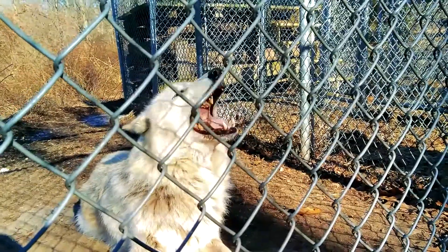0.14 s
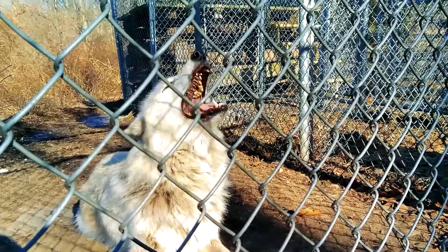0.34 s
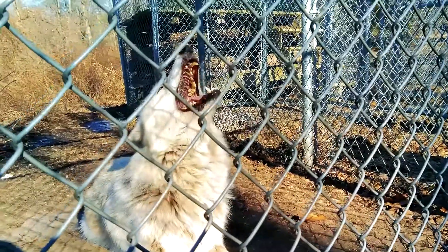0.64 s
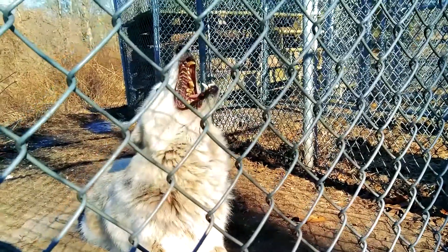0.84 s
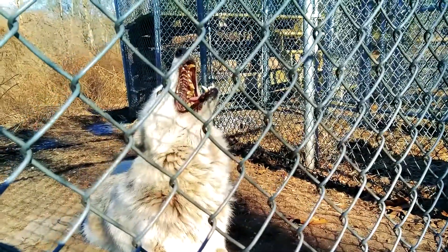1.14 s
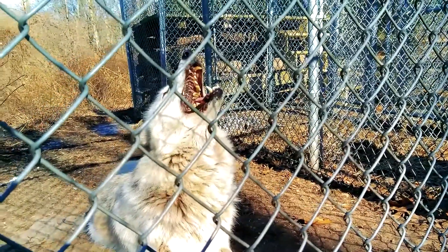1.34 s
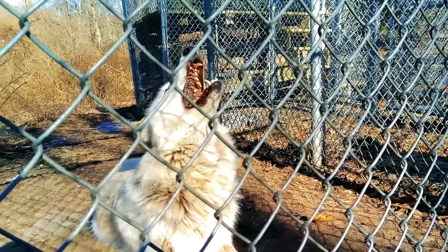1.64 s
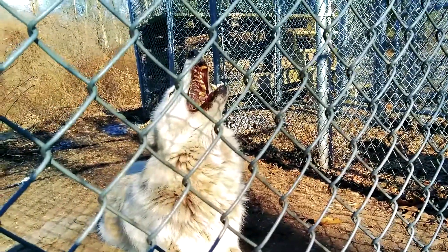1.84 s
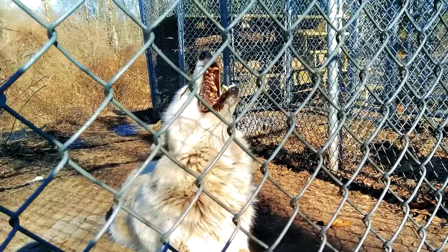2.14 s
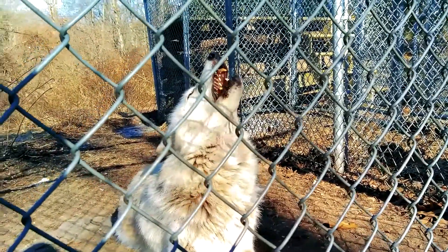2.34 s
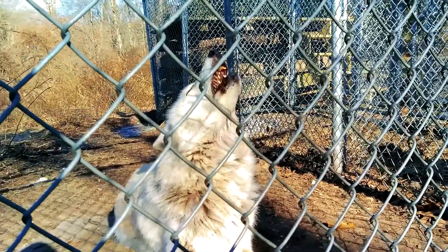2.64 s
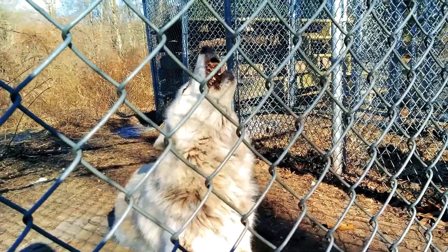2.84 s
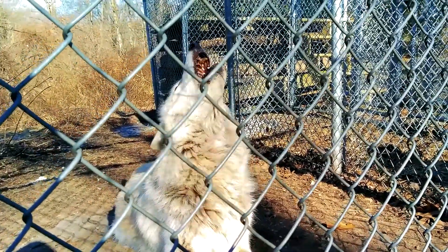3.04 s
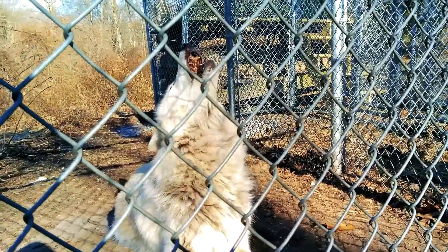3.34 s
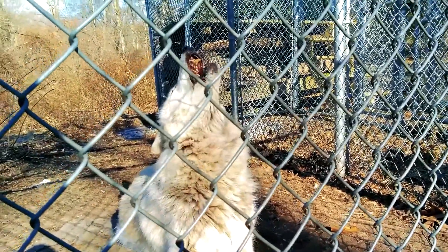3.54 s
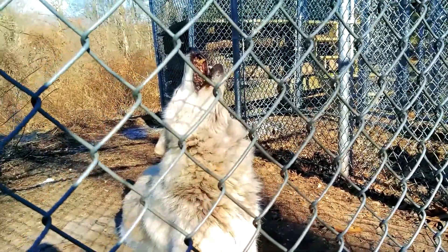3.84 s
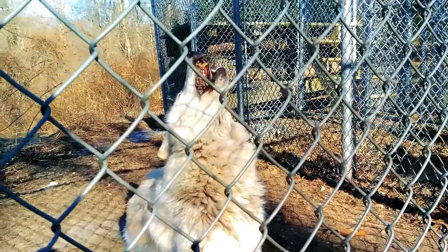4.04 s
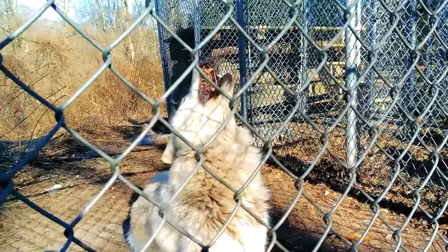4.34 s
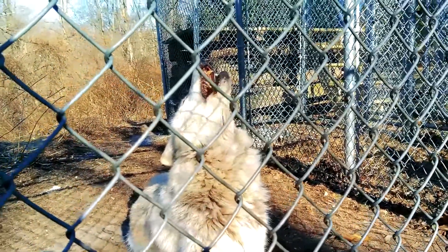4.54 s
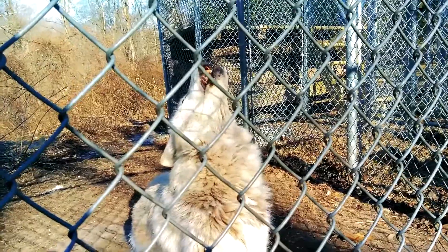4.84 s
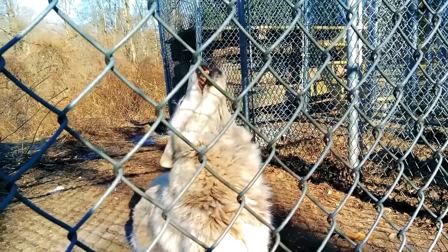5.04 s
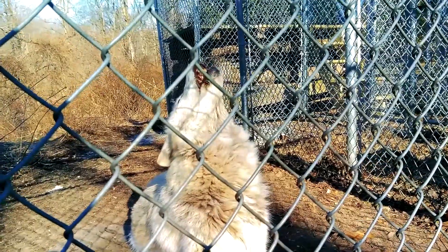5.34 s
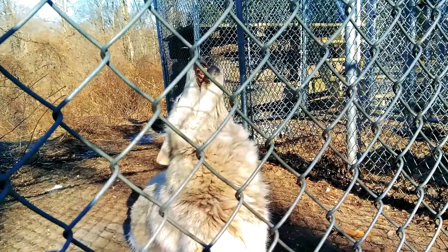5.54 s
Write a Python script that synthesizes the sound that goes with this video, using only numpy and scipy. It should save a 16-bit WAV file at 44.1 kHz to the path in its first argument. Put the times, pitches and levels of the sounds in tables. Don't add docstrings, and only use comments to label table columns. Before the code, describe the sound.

A wolf howls close to the microphone outdoors, its level held loud and flat. From 0 s a long, nearly pure, hollow note is already sounding around 900 Hz, slightly breathy and rough at first, lifting a little, then sagging to about 780 Hz by 2.4 s. A thin whistle between 5 and 6 kHz rides above it, sliding down too. From 2.4 to 2.8 s the howl stops: ragged gasping puffs of breath, a distant howl, a small far yelp and low wind thumps. At 2.8 s the wolf scoops into a second note, dips, then climbs from 3.6 s to about 1 kHz, the whistle returning strongly. Around 4.6 s, after a tiny crackle, the pitch breaks down, settling near 730 Hz; from 5 s a low second tone makes it rough and chordal until the cut at about 5.7 s. Distant pack howls waver faintly throughout; wind bumps strike near 4.5 to 5.1 s.

```python
import sys
import numpy as np
from scipy import signal
from scipy.fft import rfft, irfft, next_fast_len
from scipy.io import wavfile
from scipy.ndimage import uniform_filter1d, map_coordinates

SR = 44100
rng = np.random.default_rng(int(sys.argv[2]) if len(sys.argv) > 2 else 0)


def how_loud(loudness_db):
    steps = np.asarray(loudness_db, float) / 20
    return 10 ** steps


def put_to_file(sound):
    columns = np.atleast_2d(sound).T
    safe = np.clip(columns, -1, 1)
    whole_steps = np.round(safe * 32767)
    wavfile.write(sys.argv[1], SR, whole_steps.astype(np.int16))


N = 250488

# time_s, pitch_hz
HELD_PITCH = [
    [(0, 868), (.119, 924), (.283, 909), (.4, 953), (.66, 894), (1.2, 895), (1.38, 852), (1.57, 770),
     (2.394, 781)],
    [(2.81, 790), (3.044, 728), (3.473, 754), (3.645, 795), (3.813, 965), (4, 930), (4.232, 1012),
     (4.29, 978), (4.626, 1015)],
    [(4.627, 890), (4.726, 843), (4.771, 810), (4.865, 774), (5.15, 743), (5.404, 751), (5.45, 734),
     (5.634, 733), (5.68, 712)],
]
SUNG_SPANS = [
    [(-.1,), (2.385,)],
    [(2.815,), (5.8,)],
]
# note_end_s, next_scoop_start_s
NOTE_JOINS = [
    (2.39, 2.815),
    (4.626, 4.615),
]
# time_s, second_partial_db
FOLD_CLOSURE = [
    [(0, -26), (.2, -34.5), (.35, -27.5), (.7, -47), (1.15, -41), (1.37, -50), (1.6, -32), (2.2, -29.5),
     (2.35, -26.5)],
    [(2.81, -43), (2.9, -40), (3.2, -47), (3.9, -48.5), (4.16, -50.5), (4.3, -44.5), (4.52, -39.5),
     (4.64, -51)],
    [(4.7, -45), (4.8, -41.5), (4.9, -52), (5.28, -60.5), (5.67, -53.5)],
]
# frequency_hz, level_db
MOUTH_RESONANCE = [(3000, -17), (3700, -8.5), (4480, 3.5), (5200, -24), (5500, -1.5), (6600, -15.5),
                   (16000, -32)]
# time_s, pitch_hz
WHISTLE_PITCH = [
    [(0, 6150), (.14, 6490), (.45, 6220), (.68, 5760), (.907, 5544), (1.116, 5523), (1.376, 5394)],
    [(1.396, 5315), (1.585, 5143), (1.81, 5113), (1.93, 5160), (2.16, 5105), (2.235, 4950), (2.335, 4030)],
    [(2.815, 4280), (2.915, 4250), (2.965, 4030), (3.404, 3998), (3.678, 4190)],
    [(3.713, 4138), (3.833, 4299), (3.92, 4232), (4.107, 4292), (4.232, 4510), (4.312, 4437), (4.386, 4588),
     (4.53, 4594), (4.6, 4330)],
    [(4.87, 4040), (5.67, 4080)],
]
# time_s, whistle_db, fold_chopping_db
AIR_JET = [
    [(0, -54, -65), (.2, -42.5, -41.5), (.33, -36, -39), (.5, -24, -40), (.65, -28.5, -44), (1.2, -24, -39),
     (1.55, -29, -58.5), (2.27, -41, -66.5), (2.35, -67, -80.5)],
    [(2.82, -49, -53), (2.925, -39, -55), (2.97, -58, -65.5), (3.65, -59.5, -75.5), (3.73, -37.5, -65),
     (3.89, -45.5, -69), (4.16, -38, -67), (4.3, -28.5, -60), (4.62, -28, -53)],
    [(4.69, -58.5, -74), (4.8, -58, -82), (4.88, -71, -80), (5.1, -65, -78.5), (5.67, -64.5, -80)],
]
# frequency_hz, level_db (re whistle)
WHISTLE_OCTAVE = [(7900, -17), (8500, 4.5), (9150, -11), (10250, -37), (11000, -20), (11700, -30),
                  (12900, -27)]
# frequency_hz, level_db (re air flow)
UPPER_SIDEBAND = [(4800, -9), (5300, -19), (5900, 4.5), (6500, -16), (7300, 0.5)]
# pitch_hz, level_db (re air flow)
OUTER_SIDEBANDS = [(740, -6.5), (790, -9), (900, -18.5)]
# time_s, pitch_hz, level_db
LOW_OSCILLATOR = [
    [(3.55, 630, -53), (3.69, 472, -49), (3.85, 375, -50), (4.06, 325, -55), (4.22, 348, -55),
     (4.36, 347, -54)],
    [(4.38, 395, -55), (4.42, 390, -43), (4.52, 290, -45)],
    [(4.67, 633, -46), (4.77, 555, -39), (4.93, 506, -46), (4.99, 513, -26), (5.1, 520, -25),
     (5.2, 515, -25), (5.35, 518, -25), (5.55, 513, -25), (5.68, 511, -23)],
]
# multiple_of_tone, multiple_of_low, level_db (re low)
MIXING_PRODUCTS = [(1, 1, -12.5), (0, 2, -27), (-1, 2, -29.5), (2, -2, -31), (-2, 4, -19), (3, -3, -19),
                   (-1, 3, -53), (2, -1, -35), (3, -2, -27.5), (-1, 4, -34), (2, 1, -34.5), (1, 2, -34.5),
                   (4, -2, -47.5), (0, 3, -53)]
# time_s, air_flow_db, throat_strain_db
BREATH_FLOW = [
    [(0, -43.5, -55.5), (.28, -43, -52), (.34, -49, -52.5), (.55, -52, -53), (.65, -49, -52.5),
     (1, -49, -52.5), (1.5, -52, -55), (2.17, -64.5, -64.5), (2.37, -68, -55.5)],
    [(2.4, -69.5, -46), (2.46, -60.5, -48.5), (2.6, -64.5, -51), (2.72, -57, -47.5), (2.8, -65.5, -57.5)],
    [(2.83, -59.5, -69.5), (3.61, -57, -62), (3.75, -51, -54.5), (4.1, -52.5, -59.5), (4.4, -50, -50),
     (4.485, -44.5, -40.5), (4.55, -53, -48), (4.64, -60.5, -39)],
    [(4.68, -55, -63), (4.94, -62, -57.5), (5, -69.5, -49.5), (5.68, -70, -51)],
]
# frequency_hz, density_db (per Hz)
AIR_SPECTRUM = [(1290, -32), (2200, -3.5), (3900, -9), (4430, -2), (5350, -2.5), (6730, -12.5),
                (9300, -0.5), (15700, -16)]
# frequency_hz, density_db (per Hz)
THROAT_SPECTRUM = [(200, -39.5), (540, -19), (760, -2), (1050, -9.5), (1350, -3.5), (2100, -13.5),
                   (2700, -24.5), (6000, -50.5)]
# start_s, peak_db, length_s
INTAKE_GASPS = [
    (2.399, -39, 0.028),
    (2.436, -43.5, 0.0097),
    (2.484, -49.5, 0.057),
    (2.676, -46, .008),
    (2.706, -39, .014),
    (2.764, -44.5, 0.014),
    (2.777, -47.5, 0.015),
]
# frequency_hz, density_db (per Hz)
GASP_SPECTRUM = [(1000, -43), (2000, -6.5), (4300, -5.5), (6000, -4), (10000, -3.5), (15700, -7.5)]
# middle_s, level_db, half_length_s
CRACKLE_RUNS = [
    (0.341, -44, .05),
    (.51, -47, .04),
    (0.732, -67, 0.036),
    (4.485, -43.5, 0.019),
]
# frequency_hz, density_db (per Hz)
SLAP_SPECTRUM = [(850, -83), (1050, -3), (1400, -8.5), (1750, -14), (2600, -63.5)]
# time_s, pitch_hz, tone_db
PACK_ANSWERS = [
    [(0.0, 465, -45.5), (.1, 385, -42), (0.672, 338, -49), (0.95, 242, -76)],
    [(1.22, 270, -84), (1.27, 327, -59), (1.52, 305, -60)],
    [(1.54, 568, -51), (1.79, 520, -54.5), (1.95, 476, -69.5)],
    [(2.4, 655.6, -33.5), (2.478, 700.4, -43.5), (2.8, 665, -42.5)],
    [(2.86, 585, -60), (3.314, 424, -49.5), (4.2, 480, -50.5)],
    [(4.24, 830, -59), (4.34, 760.6, -40.5), (4.62, 747, -33.5)],
    [(4.72, 357.8, -56), (4.798, 414, -55), (4.86, 413, -51)],
    [(5.4, 470, -66), (5.558, 423.7, -43), (5.68, 424.3, -42.5)],
    [(1.5, 321, -60), (1.62, 224, -55), (1.92, 188, -72.5)],
]
PACK_SECOND_PARTIAL = [-35, -8.5, -26, -2, -38.5, -38, -19, -40, -13]
# time_s, pitch_hz, level_db
FAR_YELP = [
    (2.41, 1480, -48),
    (2.506, 1540, -42.5),
    (2.56, 1410, -108),
]
# time_s, gust_db, eddy_size_db (thump over flutter)
WIND_GUSTS = [(0.0, -52, -0.5), (0.14, -70.5, 2), (2.28, -60.5, 11.5), (2.45, -45, 19), (2.56, -52.5, 17),
              (2.78, -35.5, 19), (2.86, -52.5, 12), (4.06, -51, 7), (4.6, -30, 2.5), (4.76, -54.5, 7.5),
              (4.84, -36, 3.5), (5.68, -62, -2.5)]
# frequency_hz, density_db (per Hz)
THUMP_SPECTRUM = [(12, -19.5), (22, 13.5), (50, 5), (80, 0.5), (130, -45.5), (400, -110)]
# frequency_hz, density_db (per Hz)
FLUTTER_SPECTRUM = [(50, -33.5), (80, 0), (150, -7), (260, -15), (450, -25), (800, -52.5), (1600, -100)]
# middle_s, level_db
GUST_FRONTS = [(1.549, -45), (2.79, -56), (3.02, -49.5), (3.552, -37), (4.132, -48.5), (4.529, -26.5),
               (4.9, -30.5), (5, -35), (5.109, -42)]
# frequency_hz, level_db
FRONT_SPECTRUM = [(60, -31), (150, 8), (400, -1.5), (620, -47), (1500, -100)]


def unit(x):
    return x / np.sqrt(np.mean(x ** 2) + 1e-20)


def along(points, hz):
    f, v = np.transpose(points)
    return np.interp(np.log(hz + 1), np.log(f + 1), v)


def curves(rows):
    s, *cols = np.transpose(rows)
    return [np.interp(np.arange(N) / SR, s, c) for c in cols]


def gate(tables, edge=0.012):
    t = np.arange(N) / SR
    return sum(np.clip(np.minimum(t - rows[0][0], rows[-1][0] - t) / edge + 1, 0, 1) for rows in tables)


def wobble(rate):
    return map_coordinates(rng.standard_normal(int(N * rate / SR) + 4), [np.arange(N) * rate / SR])


def drift(rate):
    return np.interp(np.arange(N) * rate / SR, np.arange(rate * 6), rng.standard_normal(rate * 6))


def noise(spectrum):
    m = next_fast_len(N)
    white = rfft(rng.standard_normal(m))
    return unit(irfft(white * how_loud(along(spectrum, np.fft.rfftfreq(m, 1 / SR))), m)[:N])


def patchy(x, depth_db):
    z = signal.stft(x, nperseg=1024)[2]
    field = uniform_filter1d(rng.standard_normal(z.shape), size=7, axis=0)
    field = uniform_filter1d(field, size=9, axis=1)
    return unit(signal.istft(z * how_loud(depth_db * unit(field)), nperseg=1024)[1][:N])


def phase(hz, jitter):
    smooth = uniform_filter1d(uniform_filter1d(hz, size=700), size=700)
    waver = 1 + jitter * 1.244 * (drift(25) + drift(90))
    return 2 * np.pi * np.cumsum(smooth * waver) / SR


def tone(db, angle):
    return np.sqrt(2) * np.exp(np.float32(db) * np.float32(np.log(10) / 20)) * np.sin(angle)


def comb(db, carrier, fold, fall_db, count):
    out = 0
    for k in range(1, count + 1):
        out = out + tone(db - fall_db * np.log2(k) + 4 * drift(12), carrier + k * fold)
    return out


def wolf():
    hz, lost = pitch()
    high_hz, = curves(sum(WHISTLE_PITCH, []))
    partials, jet_levels, air_db, rasp_db = controls(hz, lost, high_hz)
    fold = phase(hz, jitter=0.0012)
    return (folds(hz, fold, partials, air_db, rasp_db) + jet_whistle(high_hz, fold, jet_levels, air_db)
            + low_oscillator(fold))


def pitch():
    t = np.arange(N) / SR
    held_hz, = curves(sum(HELD_PITCH, []))
    lost = 0
    for end, start in NOTE_JOINS:
        sag = 0.215 * np.exp(-abs(end - t) / 0.1)
        scoop = 0.22 * np.exp(-np.maximum(t - start, 0) / 0.016)
        lost = lost + np.where(t < end, sag, scoop)
    tremor = 0.0025 * wobble(16)
    return held_hz * (1 - lost + tremor), lost


def controls(hz, lost, high_hz):
    db2, = curves(sum(FOLD_CLOSURE, []))
    level_db, lower_db = curves(sum(AIR_JET, []))
    air_db, strain_db = curves(sum(BREATH_FLOW, []))
    harder = db2 + 40
    db3 = np.maximum(-56.5 + 0.82 * harder, strain_db - 11.5)
    db4 = air_db - 13.5 + 0.8 * harder
    upper_db = np.minimum(air_db, -50.5) - 6
    octave_db = level_db + along(WHISTLE_OCTAVE, 2 * high_hz) + (air_db + 48)
    higher_db = air_db + along(UPPER_SIDEBAND, high_hz + hz)
    outer_db = air_db + along(OUTER_SIDEBANDS, hz)
    rasp_db = strain_db + 23 + 48.5 * uniform_filter1d(lost, size=600)
    return (db2, db3, db4, upper_db), (level_db, octave_db, lower_db, higher_db, outer_db), air_db, rasp_db


def folds(hz, fold, partials, air_db, rasp_db):
    db2, db3, db4, upper_db = partials
    rasp = 1 + how_loud(rasp_db) * (wobble(120) + 0.61 * wobble(330))
    voice = tone(-19, fold) + tone(db2, 2 * fold) + tone(db3, 3 * fold)
    voice += tone(db4 + 2 * drift(9), 4 * fold)
    for k in range(5, 16):
        partial_db = np.maximum(upper_db + along(MOUTH_RESONANCE, k * hz), air_db - 26.5)
        voice += tone(partial_db + 7.0 * drift(13), k * fold)
    return voice * rasp * gate(SUNG_SPANS, edge=0.027) ** 2


def jet_whistle(high_hz, fold, levels, air_db):
    level_db, octave_db, lower_db, higher_db, outer_db = levels
    jet = phase(high_hz, jitter=0.00096)
    whistle = tone(level_db, jet) * (1 + how_loud(-19) * wobble(320) + how_loud(-24.0) * wobble(1900))
    whistle += tone(octave_db, 2 * jet) * (1 + how_loud(-10.5) * wobble(1800))
    whistle += tone(octave_db - 17 + 3 * drift(8), 3 * jet)
    whistle += comb(lower_db, jet, -fold, fall_db=21.5, count=2)
    whistle += comb(outer_db, jet - 2 * fold, -fold, fall_db=5, count=2)
    whistle += tone(higher_db + 2 * drift(9), jet + fold)
    whistle += comb(outer_db, jet + fold, fold, fall_db=14.5, count=3)
    whistle += comb(air_db - 23.5, jet + 2 * fold, fold, fall_db=-3.0, count=8)
    whistle += comb(octave_db - 26, 2 * jet, -fold, fall_db=0.0, count=4)
    whistle += comb(octave_db - 10, 2 * jet, fold, fall_db=9.0, count=5)
    whistle += comb(octave_db - 28, 3 * jet, -fold, fall_db=-2.5, count=4)
    return whistle * gate(SUNG_SPANS)


def low_oscillator(fold):
    low_hz, low_db = curves(sum(LOW_OSCILLATOR, []))
    slack = phase(low_hz, jitter=0.0016)
    low = tone(low_db, slack) * (1 + how_loud(-18.0) * wobble(130))
    for m, n, db in MIXING_PRODUCTS:
        growth_db = 0.2 * (abs(n) - 1) * (low_db + 25.5)
        low += tone(low_db + db + growth_db + 2 * drift(20), m * fold + n * slack)
    return low * gate(LOW_OSCILLATOR)


def crackle():
    t = np.arange(N) / SR
    runs = sum(how_loud(db) * np.exp(-((t - s) / half) ** 4) for s, db, half in CRACKLE_RUNS)
    slaps = np.sin(phase(np.full(N, 50 / 2), jitter=0.17)) ** 2
    return runs * unit(slaps ** 5.8) * noise(SLAP_SPECTRUM)


def breath():
    t = np.arange(N) / SR
    hiss_db, throat_db = curves(sum(BREATH_FLOW, []))
    air = how_loud(hiss_db - 1 + 2 * drift(14)) * patchy(noise(AIR_SPECTRUM), depth_db=3.8)
    flutter_db = 2.9 * np.tanh(drift(30)) + 3.3 * np.tanh(drift(90))
    air += how_loud(throat_db + flutter_db) * patchy(noise(THROAT_SPECTRUM), depth_db=4.5)
    puffs = 0
    for s, db, length in INTAKE_GASPS:
        rise = np.clip((t - s) / 0.0005, 0, 1)
        decay = np.exp(-(np.maximum(t - s, 0) / length) ** 2)
        puffs = puffs + how_loud(db - 2.0) * rise * decay
    squeak = sum(np.exp(-((t - s) / 0.031) ** 2) for s in (2.515, 2.785))
    squeak = squeak * tone(-58 + 3 * drift(90), 2 * np.pi * 4310 * t)
    return air + squeak + puffs * how_loud(1.7 * wobble(400)) * noise(GASP_SPECTRUM)


def pack():
    out = np.zeros(N)
    for rows, second_db in zip(PACK_ANSWERS, PACK_SECOND_PARTIAL):
        hz, db = curves(rows)
        angle = phase(hz, jitter=0.0051)
        howl = tone(db + 3 * drift(35) + 2 * drift(110), angle)
        howl += tone(db + second_db + 3 * drift(25) + 3.2 * drift(120), 2 * angle)
        out += gate([rows], edge=0.0022) * howl
    hz, db = curves(FAR_YELP)
    return out + gate([FAR_YELP]) * tone(db, phase(hz, jitter=0.0023))


def wind():
    t = np.arange(N) / SR
    flutter_db, size_db = curves(WIND_GUSTS)
    fronts = sum(how_loud(db) * np.exp(-((t - s) / 0.01) ** 2) for s, db in GUST_FRONTS)
    flutter = how_loud(flutter_db) * unit(how_loud(4.05 * wobble(30)) * noise(FLUTTER_SPECTRUM))
    thump = how_loud(flutter_db + size_db) * noise(THUMP_SPECTRUM)
    return thump + flutter + fronts * noise(FRONT_SPECTRUM)


def scene():
    return (wolf() + crackle() + breath() + pack() + wind())[None]


def top_cut(x):
    return signal.sosfilt(signal.butter(12, 15900, fs=SR, output="sos"), x)


def record(dry):
    held_db = -17
    power = uniform_filter1d((how_loud(1.5) * dry) ** 2, size=700)
    power = np.abs(uniform_filter1d(power, size=700))
    gain = np.minimum(1, how_loud(held_db) / np.sqrt(power + 1e-12))
    return top_cut(how_loud(1) * dry * gain)


dry = scene()
out = record(dry)
put_to_file(out)
```